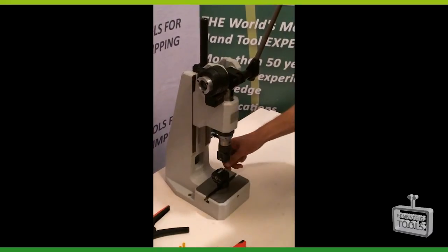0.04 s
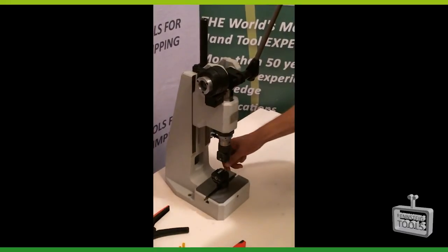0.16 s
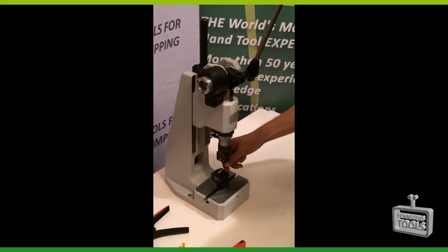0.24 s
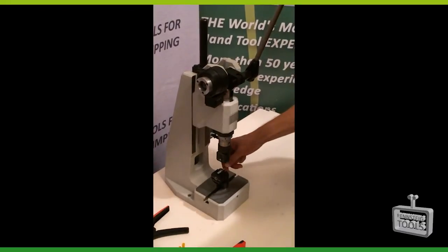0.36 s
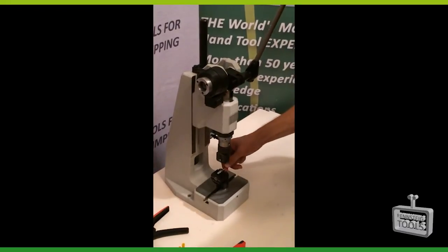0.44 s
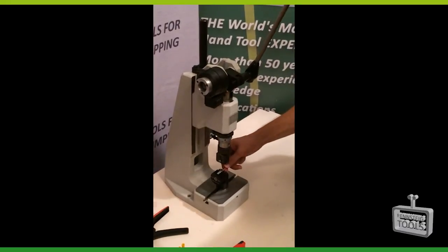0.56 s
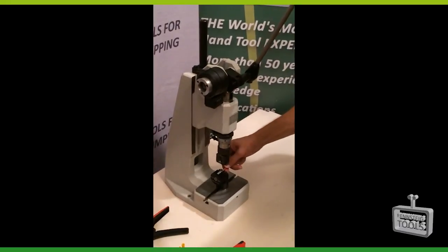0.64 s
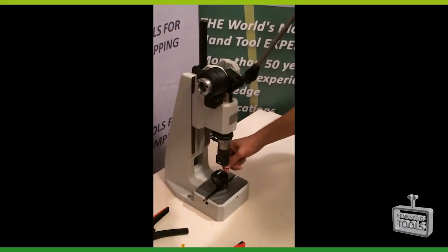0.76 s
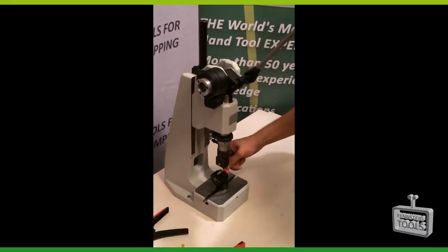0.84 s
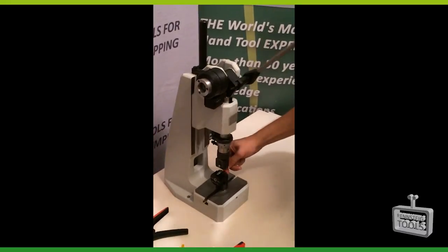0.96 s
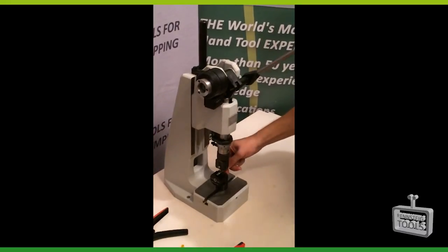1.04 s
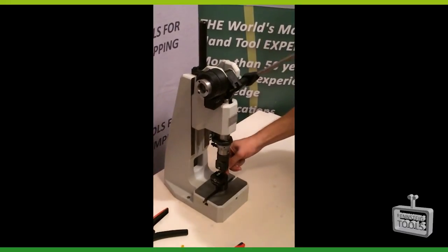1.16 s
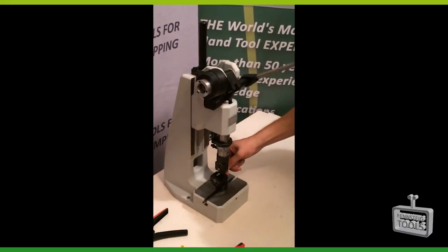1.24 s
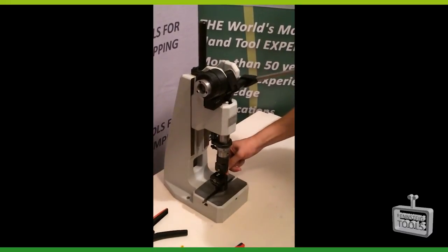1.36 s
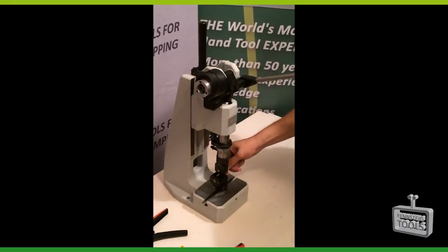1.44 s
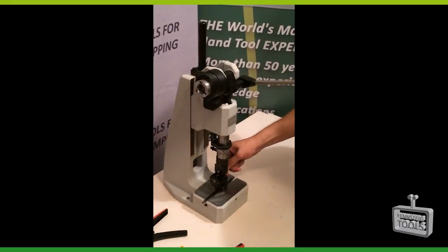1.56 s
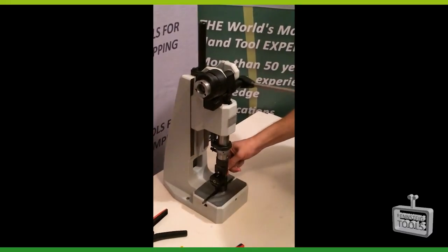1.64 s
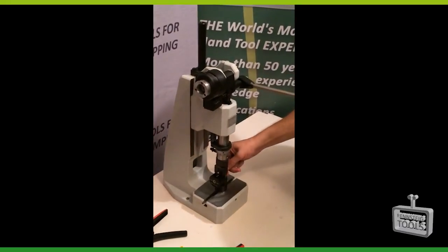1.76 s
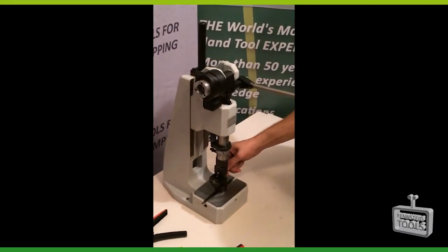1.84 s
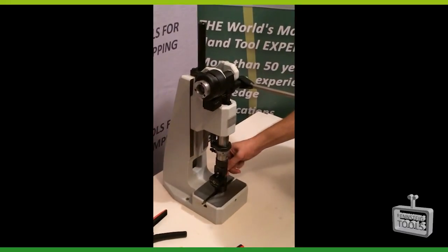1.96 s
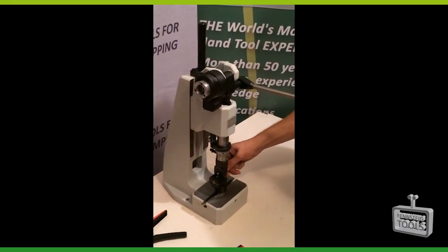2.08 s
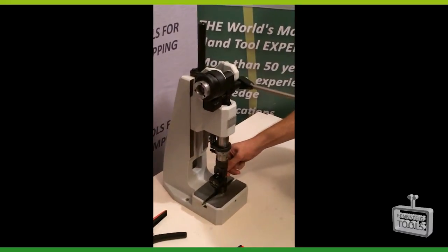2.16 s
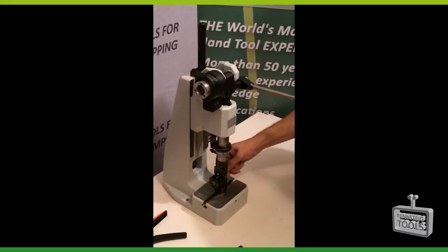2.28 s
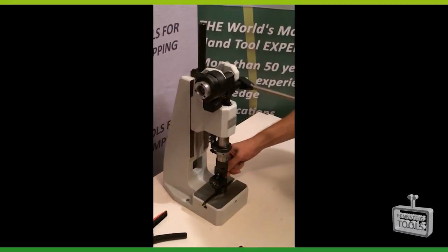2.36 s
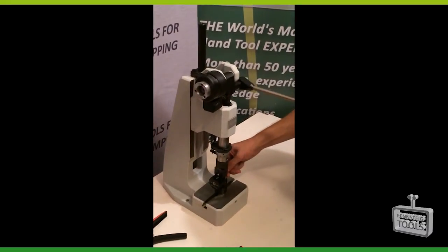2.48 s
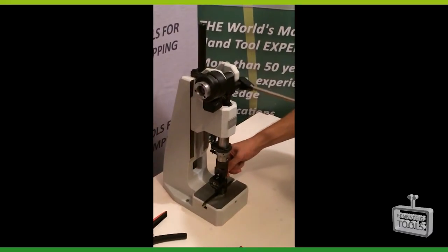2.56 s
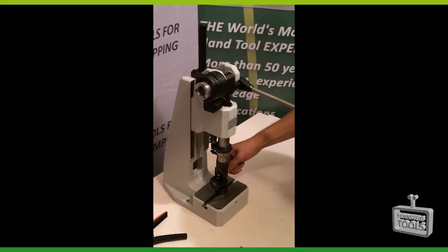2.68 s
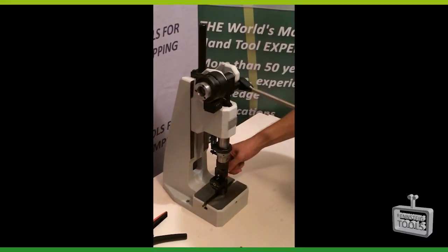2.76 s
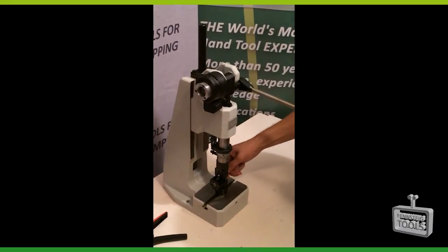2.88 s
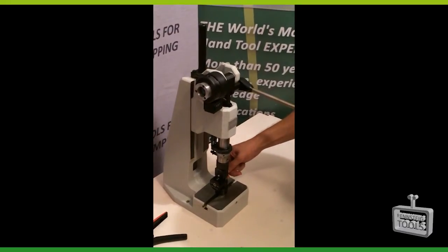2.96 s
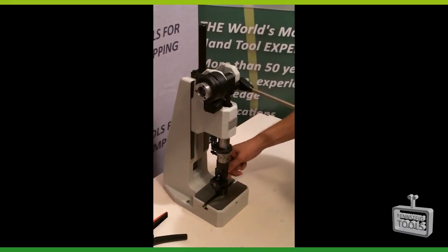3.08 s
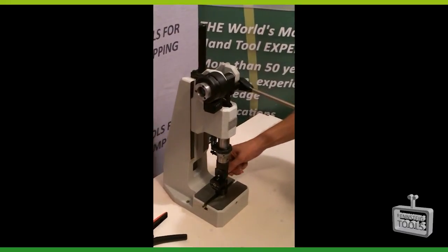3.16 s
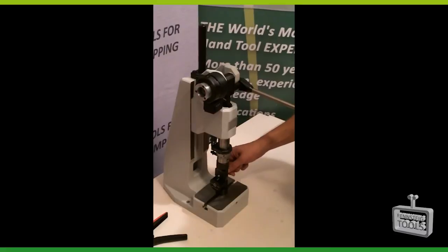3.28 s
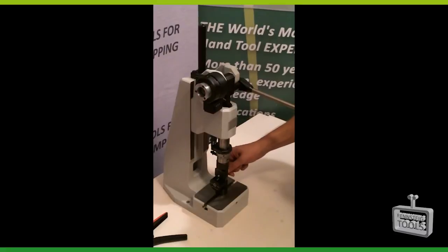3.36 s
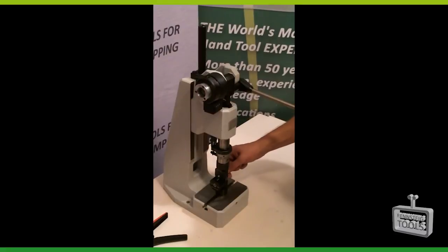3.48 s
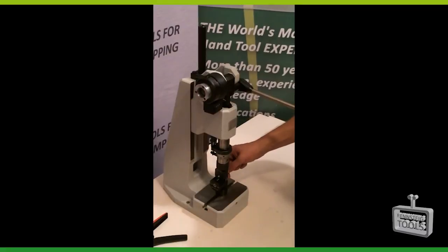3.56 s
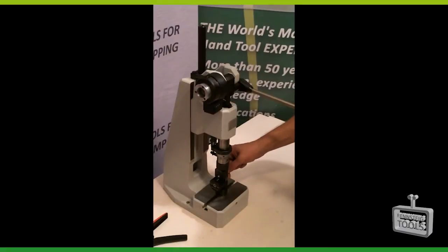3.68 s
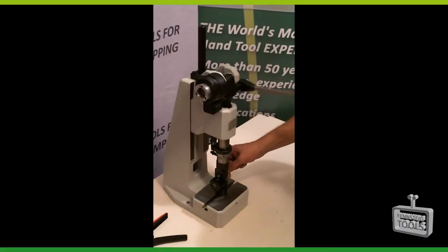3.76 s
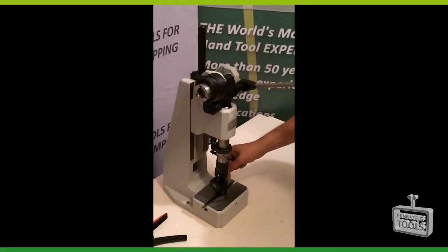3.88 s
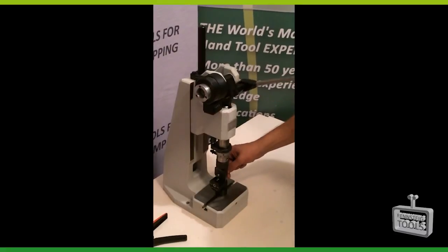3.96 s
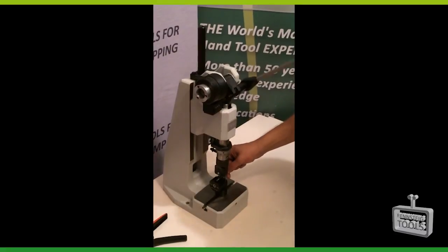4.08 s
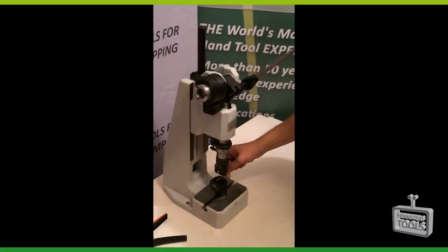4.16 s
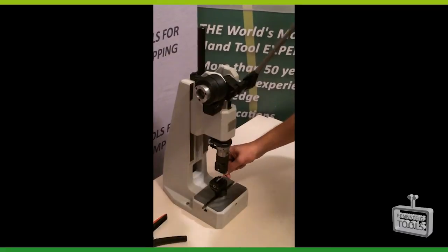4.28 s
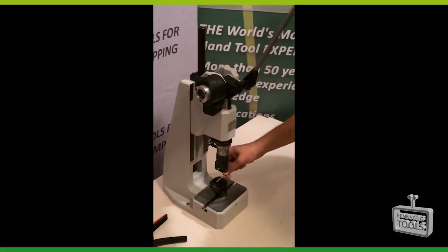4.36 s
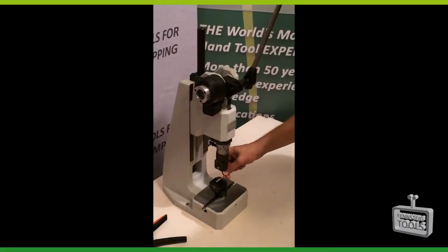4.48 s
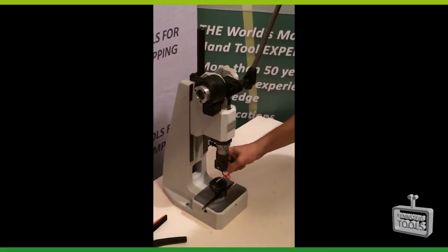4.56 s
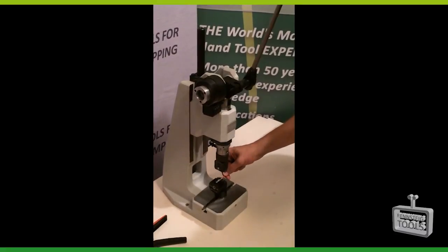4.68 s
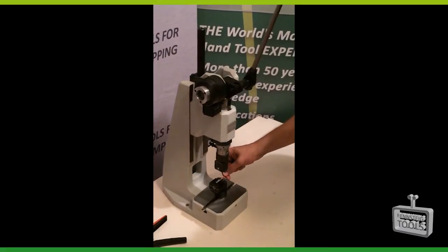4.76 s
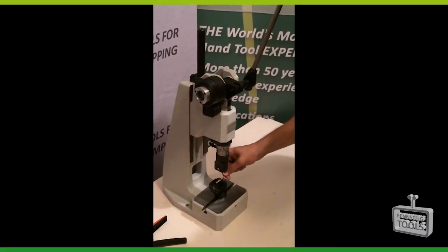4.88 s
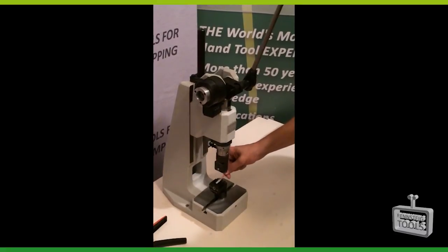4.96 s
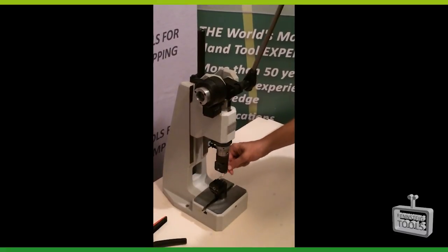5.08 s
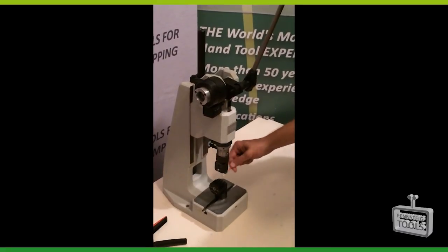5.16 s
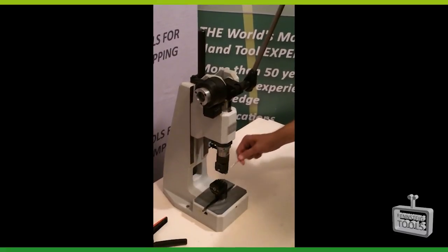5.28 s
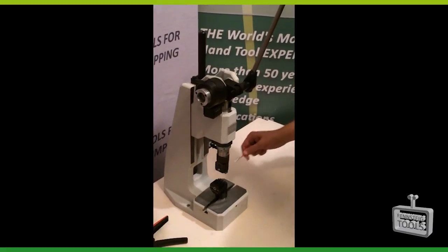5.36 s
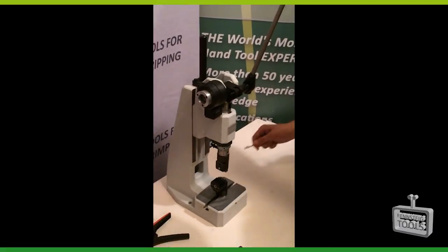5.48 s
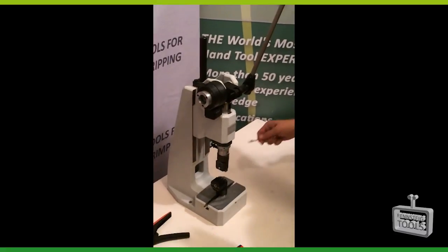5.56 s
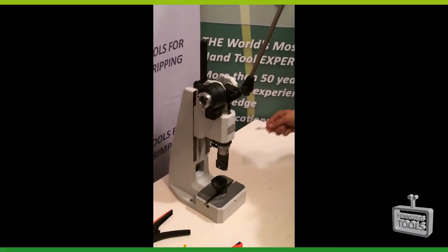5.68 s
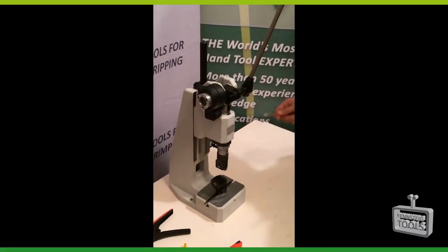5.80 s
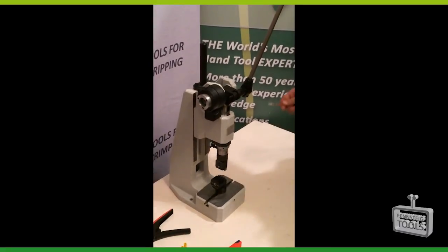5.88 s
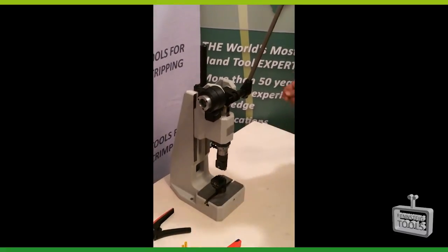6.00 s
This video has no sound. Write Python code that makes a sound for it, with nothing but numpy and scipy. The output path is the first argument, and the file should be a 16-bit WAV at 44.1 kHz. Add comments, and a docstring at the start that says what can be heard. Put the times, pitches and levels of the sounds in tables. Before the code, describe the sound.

A hand lever press gives sharp ratchet snaps and loud metallic clacks in a quiet, echoing room with a low rumble.

```python
"""A quiet, echoing room with a hand lever press on a bench. The ratchet's catch (the pawl) snaps as
the lever comes down, the ram clacks through the crimp and back, and the lever knocks on its stop.
In between, the loaded linkage ticks faintly. Each contact is a tiny rattle that sets the frame, ram
and pawl ringing, plus a slower push on the bench. The air system rumbles below, under a soft hiss."""
import sys
import numpy as np
from scipy import signal
from scipy.io import wavfile
from scipy.ndimage import uniform_filter1d

SR = 44100
rng = np.random.default_rng(int(sys.argv[2]) if len(sys.argv) > 2 else 0)


def output_pcm(signal):
    """Save a mono or channel-first signal as 16-bit PCM at the path in sys.argv[1].

    Samples are clipped to [-1, 1] before scaling.
    """
    pcm = np.clip(np.atleast_2d(signal).T, -1, 1) * 32767
    wavfile.write(sys.argv[1], SR, np.round(pcm).astype(np.int16))


N = 266011

# The tones each part rings with: f/Hz, level/dB, ring time/s (the time to fade by 60 dB)
BENCH_TONES = [(81, -13.5, 0.29), (133, 5.5, 0.28), (202, 4, 0.03), (227, -17, 1), (266, -10.5, 0.24)]
FRAME_TONES = [(360, -3, 0.029), (367, 2.5, 0.053), (489, -1.5, 0.13), (478, 1, 0.095), (643, 4.5, 0.046),
               (638, -11.5, 0.014), (793, -8, 0.021), (864.5, 0.5, 0.17), (1000, 2.5, 0.071),
               (1023.5, 3.5, 0.12), (1171, -1, 0.099), (1420, 1.5, 0.057), (1553, -3.5, 0.12)]
RAM_TONES = [(1860, 2, 0.015), (1880, 1, 0.013), (1868, -1.5, 0.022), (2126, -3.5, 0.014),
             (2448, -1.5, 0.013), (2680, -2, 0.0084), (2949, -7.5, 0.018), (3480, -5.5, 0.0097),
             (3697, -2, 0.011), (3937, -5, 0.014), (4300, -7, 0.014), (4760, -8, 0.016),
             (4820, -4.5, 0.013)]
PAWL_TONES = [(5350, 8.5, 0.0084), (5700, 6, 0.0071), (6254, 3.5, 0.014), (7000, -3, 0.0025),
              (7018, 0, .02), (8190, -3.5, 0.026), (8430, 0, .015), (8750, -6.5, 0.032),
              (9200, -3.5, 0.014), (10300, -6, 0.028), (11020, -6.5, 0.03), (12500, 0.5, 0.024),
              (13105, -3, .01), (15600, -3.5, 0.0097), (15900, 0, .01)]
# Range and crack of bench, frame, ram, pawl: lowest f/Hz, highest f/Hz, crack against ring/dB
PART_RANGES = [(49.5, 260, -8), (249, 1430, 0.5), (1334.5, 4460, -9), (4200, 21000, 1.5)]
# How those parts favour the struck pitch: loss an octave away/dB, greatest loss/dB, boost at it/dB
PART_FOCUS = [(30, 22, 0), (26, 15, 4), (16, 12, 1), (5, 30, 10)]
SHAKEN_PAWL_FOCUS = (5, 30, 0)   # same columns: no boost when the blow lands elsewhere
# Pawl snaps: t/s, pawl level/dB, frame level/dB, frame f/Hz, pawl f/Hz
SNAPS = [(1.265, -35, -34, 1480, 5740), (1.28, -11.5, -19, 1550, 7860), (1.692, -10.5, -25, 932, 5540),
         (4.055, -53, -63.5, 900, 6300), (4.224, -46.5, -49, 1206, 7000), (4.235, -7, -13, 1163, 5546),
         (5.71, -52.5, -76, 721, 12000)]
# Ram and lever blows:
# t/s, frame level/dB, dullness/dB, frame f/Hz, ram f/Hz, bench level/dB, bench f/Hz, rattle/ms
CLACKS = [(2.7272, 1, 8.5, 652, 3700, -18, 179, 2.1), (2.731, -2.5, 21, 1345, 1885, -41.5, 245, 1.68),
          (2.794, -14, 9, 650, 2540, -14.5, 134, 1.7), (3.641, -32.5, 28.5, 696, 1955, -36, 260, 3.5),
          (3.649, -18.5, 15.5, 930, 2760, -45, 262.4, 4), (3.767, -1.9, 17, 532.7, 2860, -8, 196.6, 6),
          (3.772, -4.5, 32, 1000, 1800, -18.5, 83.6, 2.3), (3.807, -24, 25.5, 820, 1750, -30.5, 183, 2.8),
          (3.834, -23, 2, 560, 1955, -17.5, 130, 1.5), (4.51, -25, 4.5, 700, 2570, -16, 137.8, 4.5),
          (4.514, -8.5, 21, 757, 2750, -30, 140, 3.7)]
# Linkage ticks: t/s, frame level/dB, dullness/dB, frame f/Hz, rattle/ms
TICKS = [(1.55, -44, 29, 670, 35), (2.201, -38, 24, 470, 4.7), (3.021, -40, 19, 723, 5.7),
         (3.111, -45.5, 21, 754, 3.9), (3.144, -60, -2, 494, 2.5), (3.228, -35, 13.5, 410, 3.3),
         (3.298, -46.5, 19, 980, 6.6), (3.499, -44, 19, 910, 5.2)]
# How long the room rings: f/Hz, ring time/s
ROOM_RING = [(100, 0.6), (500, 0.34), (2000, .4), (6000, 0.42), (14000, 0.25)]
# The room's echo against the direct sound: f/Hz, level/dB
ROOM_LEVELS = [(100, -15.5), (300, 3.5), (800, -1), (2000, -3), (6000, -4), (10000, -1.5), (15000, -5.5)]
# The shape of the rumble and hiss: f/Hz, relative level/dB
AIR_SHAPE = [(12, -36), (20, -20.5), (49, 1.5), (97, -5), (124, 0.5), (192, -7), (226, 5), (281, -16.5),
             (350, -20), (390, -8.5), (435, -22.5), (711, -20.5), (771, -19), (3650, -37.5), (13500, -42.5)]

SPOTS = 4   # places on the press where contacts happen, each with its own echoes
SNAP_RATTLE_MS, BENCH_SWELL_MS = 3.3, 17
# Shares of a part's free ring time; the crack is shortest, damped while the faces touch.
SNAP_RING, CLACK_RING, TICK_RING, CRACK_RING = 0.28, 0.55, 0.35, 0.25


def press():
    """Every contact shakes bench, frame, ram and pawl, each by its own amount; one track per spot."""
    tracks = np.zeros((SPOTS, N + SR))
    t = np.arange(SR * 2 // 5) / SR
    tones = (BENCH_TONES, FRAME_TONES, RAM_TONES, PAWL_TONES)
    contacts = sorted(pawl_snaps() + clacks() + linkage_ticks())
    for k, (start_s, levels, pitches, rattle_ms, ring_share, focus) in enumerate(contacts):
        start = round(start_s * SR)
        force = rattle(rattle_ms, size=SR // 6)
        # The bench top takes the blow through the base and builds up slowly.
        push = rng.standard_normal(len(t)) * t * np.exp(-t * 1000 / BENCH_SWELL_MS)
        forces = (push, force, force, force)
        ring_shares = (1, ring_share, ring_share, ring_share)
        parts = zip(forces, tones, PART_RANGES, pitches, focus, ring_shares)
        for part_db, part in zip(levels, parts):
            sound = from_db(part_db) * struck_part(*part)
            tracks[k % SPOTS, start:start + len(sound)] += sound
    return tracks[:, :N]


def clacks():
    """The ram and the lever strike home and bounce back."""
    return [frame_blow(*row, CLACK_RING) for row in CLACKS]


def pawl_snaps():
    """The pawl drops over a ratchet tooth; the ram rings along and the bench barely stirs."""
    contacts = []
    for start_s, pawl_db, frame_db, frame_hz, pawl_hz in SNAPS:
        levels = (pawl_db - 37.5, frame_db, pawl_db - 3, pawl_db)   # bench, frame, ram, pawl
        pitches = (200, frame_hz, 3380, pawl_hz)
        contacts.append((start_s, levels, pitches, SNAP_RATTLE_MS, SNAP_RING, PART_FOCUS))
    return contacts


def linkage_ticks():
    """The loaded linkage shifts with faint ticks; a duller tick strikes lower tones in the ram."""
    return [frame_blow(start_s, frame_db, dull_db, frame_hz, ram_hz=3900 * 2 ** (-dull_db / 37.5),
                       bench_db=frame_db - 12, bench_hz=125, rattle_ms=rattle_ms, ring_share=TICK_RING)
            for start_s, frame_db, dull_db, frame_hz, rattle_ms in TICKS]


def frame_blow(start_s, frame_db, dull_db, frame_hz, ram_hz, bench_db, bench_hz, rattle_ms, ring_share):
    """One contact on the frame: the duller it is, the less of it reaches the ram and the pawl."""
    ram_db = frame_db + 3 - 0.56 * dull_db
    pawl_hz = 6840 * 2 ** (-dull_db / 20)   # an octave lower for every 20 dB of dullness
    levels = (bench_db, frame_db, ram_db, frame_db - dull_db)
    pitches = (bench_hz, frame_hz, ram_hz, pawl_hz)
    return start_s, levels, pitches, rattle_ms, ring_share, PART_FOCUS[:-1] + [SHAKEN_PAWL_FOCUS]


def rattle(length_ms, size):
    """Steel faces meet in many tiny, uneven hits; a longer rattle also starts more softly."""
    progress = np.arange(size) / SR * 1000 / max(length_ms, 0.3)
    hits = rng.standard_normal(size) * from_db(0.63 * rng.standard_normal(size))
    rise = 1 - np.exp(-(progress / 0.37) ** 2)
    fade = np.exp(-(progress / 1.6) ** 1.4)
    return hits * rise * fade


def struck_part(force, tones, part_range, struck_hz, focus, ring_share):
    """A part cracks and rings, mostly in the tones near the struck pitch; the peak is about 1."""
    low_hz, high_hz, crack_db = part_range
    octave_loss_db, max_loss_db, boost_db = focus
    sound = 0
    for k, (hz, db, ring_s) in enumerate(tones):
        ringing = level_peak(ring(force, hz, ring_s * ring_share))
        crack = level_peak(ring(force, hz, ring_s * CRACK_RING))
        octaves_away = np.log2(hz / struck_hz)
        ping_db = boost_db * np.exp(-(octaves_away / 0.06) ** 2)
        loss_db = min(octave_loss_db * octaves_away ** 2, max_loss_db)
        gain = from_db(db + ping_db - loss_db) * (-1) ** k   # every other tone is flipped
        sound = sound + gain * (ringing + from_db(crack_db) * crack)
    return band(level_peak(sound), low_hz, high_hz)


def ring(force, hz, ring_s):
    """One tone: a click of height 1 starts a fading sine wave of height 1."""
    decay = from_db(-60 / (ring_s * SR))
    angle = 2 * np.pi * hz / SR
    return signal.lfilter([0, np.sin(angle)], [1, -2 * decay * np.cos(angle), decay ** 2], force + 1e-18)


def room_echo(tracks):
    """Echoes blur together: bands of noise a third of an octave wide, each fading at its own rate."""
    t = np.arange(SR // 2) / SR
    noise = rng.standard_normal((2, SPOTS, len(t)))
    edges_hz = 60 * 2 ** np.arange(0, 8.3, 1 / 3)
    rise = 1 - np.exp(-(t / 0.00077) ** 2)
    tail = 0
    for k, (low, high) in enumerate(zip(edges_hz, edges_hz[1:])):
        hz = np.sqrt(low * high)
        fade = from_db(-60 * t / at_hz(ROOM_RING, hz))
        echoes = band(noise[k % 2], low, high) * rise * fade
        energy = np.sum(echoes ** 2, axis=1, keepdims=True)
        tail = tail + from_db(at_hz(ROOM_LEVELS, hz)) * echoes * np.sqrt(2 * (high - low) / SR / energy)
    return signal.fftconvolve(tracks, tail, axes=1)[:, :N].sum(axis=0)


def air_noise(level_db):
    """The air system rumbles and the microphone hisses; the bass wavers, the hiss is smooth."""
    run_in = SR // 2   # lets the filters settle
    noise = rng.standard_normal((2, N + run_in))
    edges_hz = 18 * 2 ** np.arange(0, 9.8, 1 / 3)
    sound = 0
    for k, (low, high) in enumerate(zip(edges_hz, edges_hz[1:])):
        hz = np.sqrt(low * high)
        waver_db = 3.4 * drift(rate_hz=0.6) / (1 + hz / 600)
        gain = from_db(at_hz(AIR_SHAPE, hz) + waver_db)
        sound = sound + gain * band(noise[k % 2], low, high)[run_in:]
    treble_cut = signal.cheby2(16, 40, 14300, fs=SR, output="sos")
    return from_db(level_db) * level_average(signal.sosfilt(treble_cut, sound))


def drift(rate_hz):
    """A slow random wander of typical size 1, worked out once every 40 samples."""
    decay = np.exp(-80 * np.pi * rate_hz / SR)
    noise = rng.standard_normal(N // 40 + 2002)
    slow = signal.lfilter([1], [1, -2 * decay, decay ** 2], noise)[2000:]
    return np.interp(np.arange(N) / 40, np.arange(len(slow)), level_average(slow))


def from_db(db):
    """Turn decibels into a number to multiply by."""
    return 10 ** (np.asarray(db) / 20)


def level_peak(x):
    """Scale a sound so its loudest stretch swings to about 1."""
    return x / np.sqrt(2 * uniform_filter1d(x[::2] ** 2, size=200).max())


def level_average(x):
    """Scale a sound so its average power is 1."""
    return x / np.sqrt(np.mean(x ** 2) + 1e-20)


def at_hz(table, hz):
    """Read a value between the rows of a frequency table."""
    frequencies, values = np.array(table).T
    return np.interp(np.log(hz), np.log(frequencies), values)


def band(x, low_hz, high_hz):
    """Keep the sound between two frequencies."""
    band_pass = signal.butter(2, [low_hz, min(high_hz, 0.45 * SR)], "band", fs=SR, output="sos")
    return signal.sosfilt(band_pass, x)


def scene():
    """The press, its echo and the air, in one channel."""
    tracks = press()
    return (tracks.sum(axis=0) + room_echo(tracks) + air_noise(level_db=-44))[None]


def record(dry):
    """The loudest clacks overload the input unevenly, which leaves a low thump; the top treble is cut."""
    clipped = np.clip(dry, -0.94, 0.94)
    lopsided = clipped + 0.056 * clipped ** 2
    centred = signal.lfilter([1, -1], [1, -np.exp(-2 * np.pi * 8 / SR)], lopsided)   # cut below 8 Hz
    treble_cut = signal.cheby2(18, 70, 16400, fs=SR, output="sos")
    return signal.sosfilt(treble_cut, centred)


dry = scene()
out = record(dry)
output_pcm(out)
```